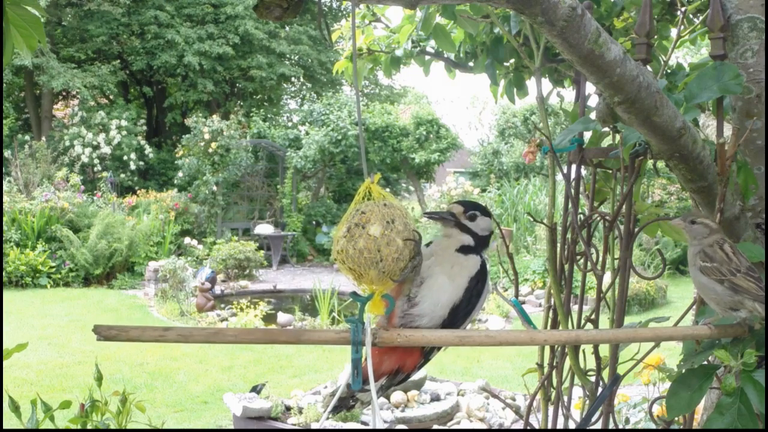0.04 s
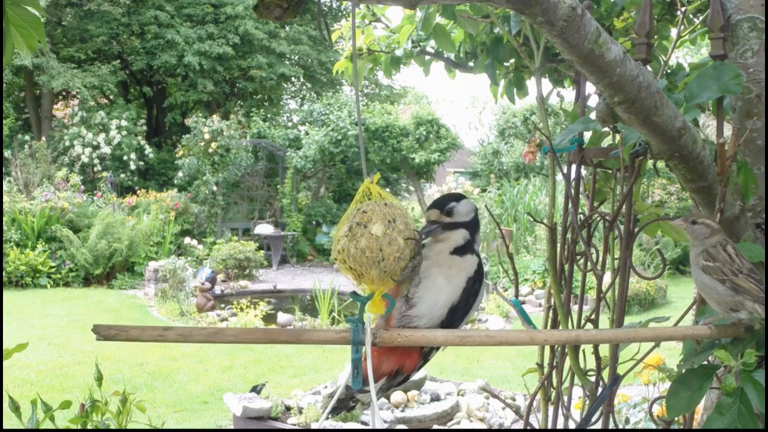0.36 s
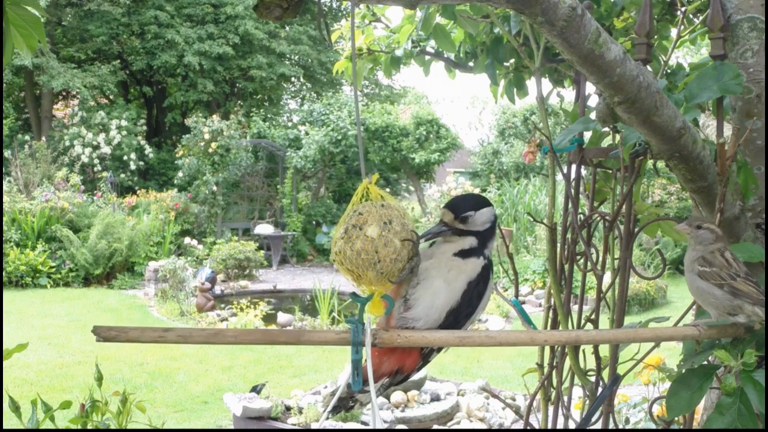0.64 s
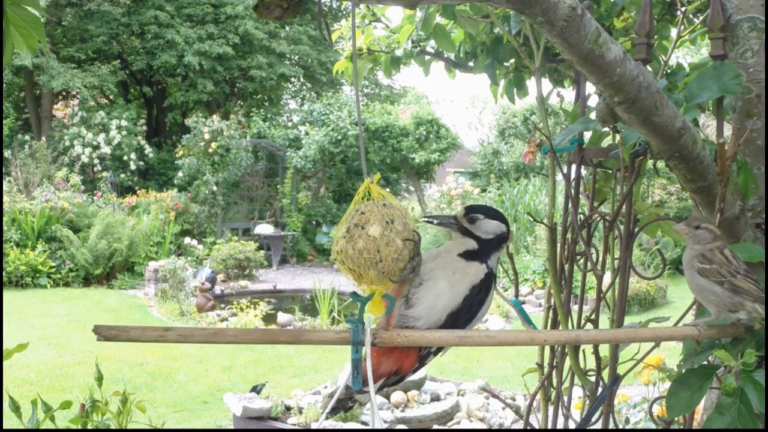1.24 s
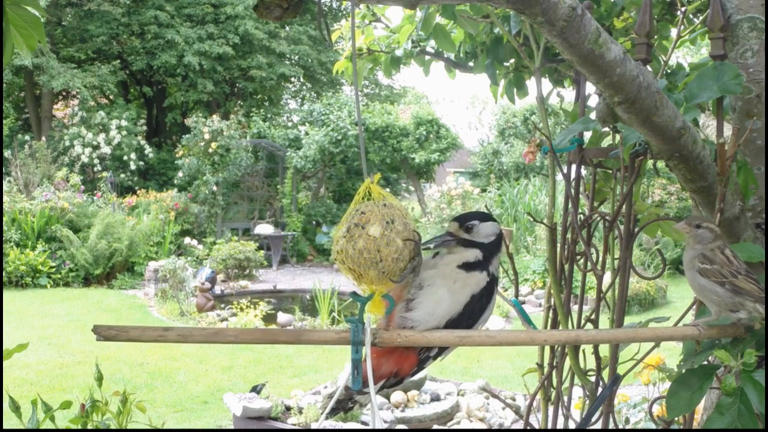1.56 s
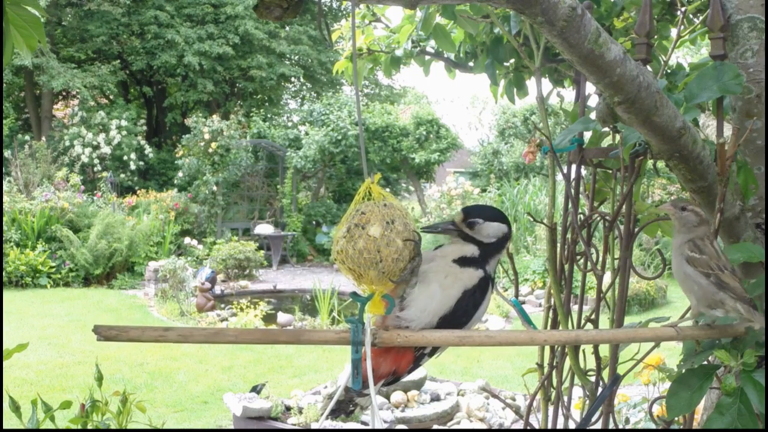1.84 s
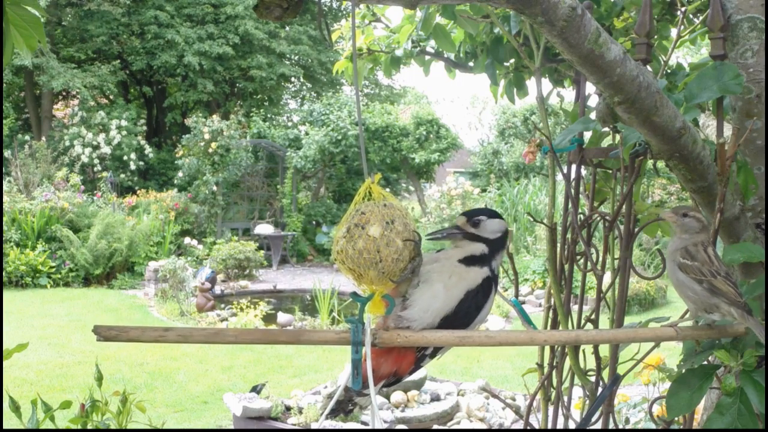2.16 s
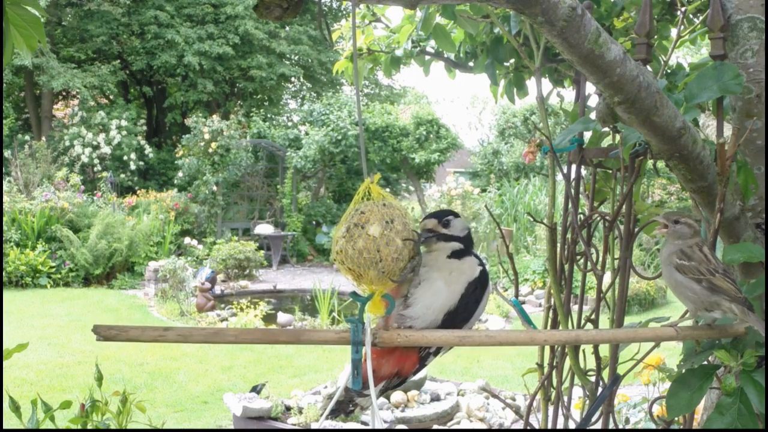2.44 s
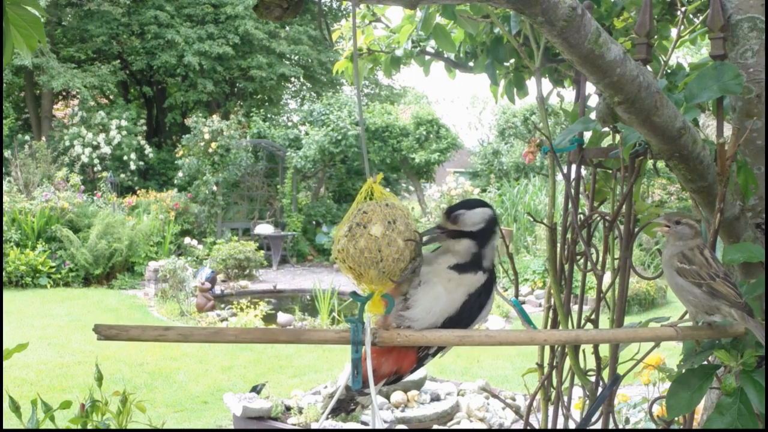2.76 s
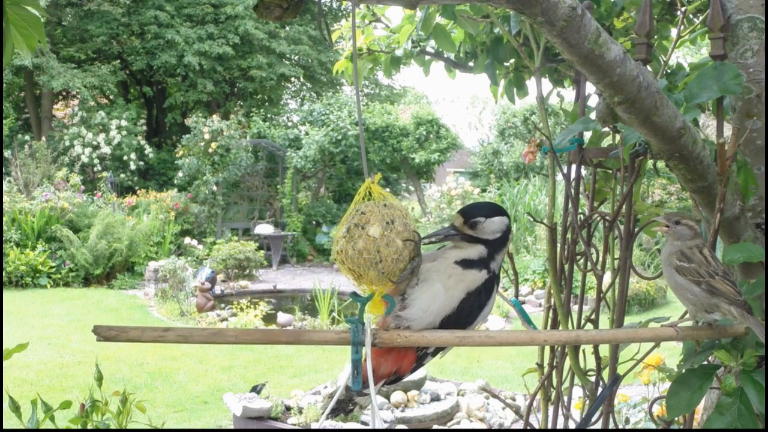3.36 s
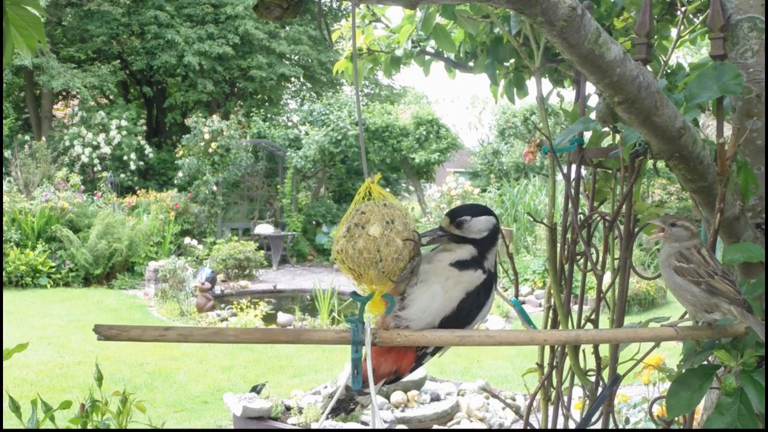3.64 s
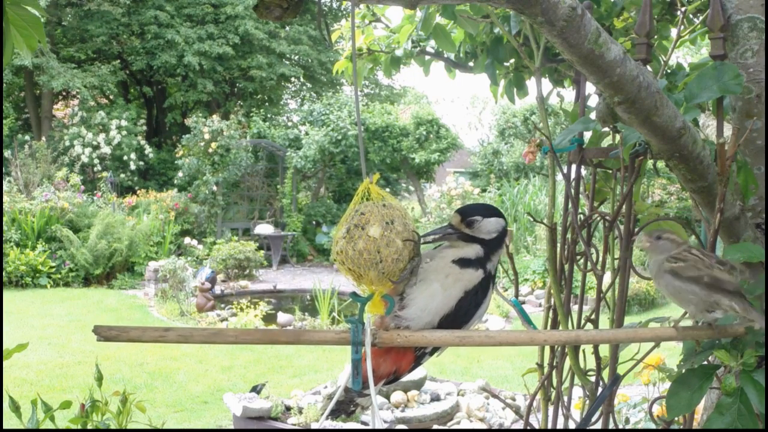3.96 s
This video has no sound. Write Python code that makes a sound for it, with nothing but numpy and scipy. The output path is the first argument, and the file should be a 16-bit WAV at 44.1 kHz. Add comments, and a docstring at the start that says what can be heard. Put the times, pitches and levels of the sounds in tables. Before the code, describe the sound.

In a quiet garden, faint raspy sparrow chirps and soft woodpecker pecks sit over a distant rumble and leaf hiss. Near the end, much louder wings flutter against the microphone, pushing air into it, scraping and knocking its housing.

```python
"""A small bird flutters right by the microphone, probably taking off, after a quiet spell in a garden.
Each wingbeat pushes a thump of air into the microphone, and feathers scuff its housing amid a few knocks.
Before that, a woodpecker picks softly at a fat ball while sparrows chirp in the trees in raspy whistles.
Behind them are other birds, faint hoots, thin ticks, a distant rumble and the hiss of leaves."""
import sys
import numpy as np
from scipy import signal
from scipy.fft import rfft, irfft
from scipy.io import wavfile
from scipy.ndimage import uniform_filter1d

SR = 44100
rng = np.random.default_rng(int(sys.argv[2]) if len(sys.argv) > 2 else 0)


def unload_audio(sound):
    """Save the sound as a 16-bit wav file, at the path given as the first command line argument."""
    columns = np.transpose(np.atleast_2d(sound))
    # keep every value between -1 and 1, then stretch to whole-number steps
    steps = np.round(np.clip(columns, -1, 1) * 32767)
    wavfile.write(sys.argv[1], SR, steps.astype(np.int16))


N = 176400
T = np.arange(N) / SR


def undb(db):
    """Turn decibels into a gain."""
    return 10 ** (np.asarray(db) / 20)


def unit(x):
    """Scale a signal to an average power of 1."""
    return x / np.sqrt(np.mean(x ** 2) + 1e-18)


def wander(rate_hz):
    """A smooth random drift of about 1 either way."""
    step = max(int(SR / rate_hz), 1)
    return unit(uniform_filter1d(np.repeat(rng.standard_normal(N // step + 2), step), step)[:N])


def convolve(x, response):
    """Pass a sound through a filter or echo pattern scaled to an energy of 1."""
    return signal.fftconvolve(x, response / np.linalg.norm(response))[:N]


def colour(x, tone):
    """Shape the bass and treble along a curve of (freq_hz, gain_db) points."""
    hz, db = np.array(tone, float).T
    size = 8192
    freqs = np.maximum(np.arange(size // 2 + 1) * SR / size, 1)
    cepstrum = irfft(np.log(undb(np.interp(np.log(freqs), np.log(hz), db))))
    # folding it in half keeps the filter from ringing before the sound arrives
    cepstrum[1:size // 2] *= 2
    cepstrum[size // 2 + 1:] = 0
    return convolve(x, irfft(np.exp(rfft(cepstrum))))


def grit(per_s, spread_db):
    """Dense random clicks whose sizes vary with spread_db."""
    clicks = (rng.random(N) < per_s / SR) * rng.choice([-1, 1], N)
    return unit(clicks * undb(spread_db * rng.uniform(-2.6, 2.4, N)))


def burst(start_s, hold_s=0, fade_s=0.001):
    """A loudness curve that jumps up, holds and dies away."""
    return (T >= start_s) * np.exp(-np.maximum(T - start_s - hold_s, 0) / fade_s)


def bump(centre_s, width_s):
    """A bell-shaped rise and fall."""
    return np.exp(-((T - centre_s) / width_s) ** 2 / 2)


def add(out, start_s, x):
    """Mix x into out from the given time on."""
    i = int(start_s * SR)
    out[i:i + len(x)] += x[:max(N - i, 0)]


def whistle(hz, rough, shake_hz=400, shakes_per_s=900):
    """A bird's tone whose pitch and strength shake quickly when it is rough."""
    steps = T[:len(hz)] * shakes_per_s
    shake, tremble = (rough * np.interp(steps, np.arange(512), row)
                      for row in rng.standard_normal((2, 512)))
    phase = 2 * np.pi * np.cumsum(hz + shake_hz * shake) / SR
    return unit((1 + 1.2 * tremble) * np.sin(phase))


def garden_echo(x, echo_db, ring_s=0.65):
    """Trees and walls add a wash of reflections that drops 60 dB in ring_s."""
    echoes = rng.standard_normal(N) * undb(-60 * T / ring_s) * (1 - np.exp(-T / 0.0024))
    return x + undb(echo_db) * convolve(x, echoes)


def air(noise_db=-54, hum_hz=100.4, hum_db=-66.5):
    """Distant rumble and leaf hiss, with a faint wavering hum."""
    # tone of the garden air: freq_hz, gain_db
    air_tone = [(20, -10), (50, 4), (75, -3.5), (105, -1.5), (160, -5.5), (300, -7), (500, -12),
                (1000, -16), (2400, -22), (4600, -25), (5600, -27), (7000, -33.5), (10500, -35),
                (15000, -46.5)]
    hum = np.sqrt(2) * np.sin(2 * np.pi * np.cumsum(hum_hz + 3.18 * wander(8.7)) / SR)
    noise = colour(rng.standard_normal(N), air_tone)
    return noise * undb(noise_db + 0.3 * wander(2.18)) + undb(hum_db) * hum


def hoots():
    """Soft, pure, low notes from far off."""
    # each hoot: start_s, length_s, pitch_hz, level_db
    notes = [(0.464, 0.11, 272, -55), (2.059, 0.057, 341, -49)]
    out = np.zeros(N)
    for start, length, hz, db in notes:
        t = np.arange(0, length, 1 / SR)
        add(out, start, undb(db) * np.sin(np.pi * t / length) * unit(np.sin(2 * np.pi * hz * t)))
    return garden_echo(out, echo_db=-14)


def twitter(per_s=7, length_s=0.07, pitch_hz=4505, spread_hz=700, fall_hz=475, level_db=-66.5):
    """Raspy, falling chirps of distant sparrows that overlap at random."""
    progress = np.linspace(0, 1, int(length_s * SR))
    out = np.zeros(N)
    for slot, (late, height) in enumerate(rng.random((int(per_s * N / SR), 2))):
        hz = pitch_hz + spread_hz * (2 * height - 1) - fall_hz * (progress - 0.5)
        chirp = np.sin(np.pi * progress) * whistle(hz, rough=0.9)
        add(out, (slot + late) / per_s, undb(level_db) * chirp)
    return garden_echo(out, echo_db=-4)


def other_birds():
    """Short gliding whistles from around the garden."""
    # each note: start_s, length_s, start_hz, end_hz, level_db, roughness (0 is pure)
    notes = [(0.066, 0.1, 3830, 4030, -63, 0.36), (.434, 0.081, 4710, 4670, -64, 0.33),
             (.495, 0.055, 4100, 3870, -59, 0.8), (0.686, 0.11, 7800, 7750, -74, 0.44),
             (.79, .06, 5120, 5080, -63, 0.14), (1.037, .06, 4840, 4660, -62, 1.1),
             (1.145, 0.067, 3730, 3880, -61.5, 0.6), (1.628, 0.046, 4950, 4600, -61, .7),
             (1.828, 0.049, 5810, 5530, -66.5, 1.1), (1.859, 0.058, 3800, 3700, -59, 0.43),
             (1.884, .055, 4050, 3960, -62.5, 0.9), (2.132, .045, 5880, 5800, -66, .4),
             (2.177, 0.068, 4510, 4350, -60, 1.47), (2.22, 0.063, 4630, 4600, -63, 0.33),
             (2.54, 0.025, 5800, 5200, -62, 1.05), (2.547, 0.062, 5240, 5130, -60, 0.43),
             (2.742, .072, 5200, 4650, -62, 1.3), (2.779, 0.043, 4900, 3920, -56, 0.47),
             (2.822, 0.047, 3850, 3600, -59, .9), (2.887, 0.034, 5440, 3840, -62, 1.1),
             (2.908, 0.084, 3750, 3840, -57.5, 0.4), (3.147, .27, 4780, 4930, -66.5, 1.37),
             (3.258, 0.1, 4680, 4620, -64, 0.97), (3.235, 0.17, 1824, 1830, -66.5, .08),
             (3.683, 0.083, 2155, 2070, -54, 0.06)]
    out = np.zeros(N)
    for start, length, start_hz, end_hz, db, rough in notes:
        progress = np.linspace(0, 1, int(length * SR))
        hz = start_hz + (end_hz - start_hz) * progress
        add(out, start, undb(db) * np.sin(np.pi * progress) * whistle(hz, rough))
    return garden_echo(out, echo_db=-4)


def ticks():
    """Tiny bursts of noise make dry, very high ticks."""
    # each tick: start_s, level_db
    hits = [(1.028, -57), (1.343, -58.5), (1.407, -61.5)]
    # thin tone of a tick: freq_hz, gain_db
    tick_tone = [(7000, -21), (9000, -2), (10200, 2), (11500, -5), (15000, -32)]
    loudness = sum(undb(db) * burst(start, fade_s=0.0034) for start, db in hits)
    return colour(loudness * rng.standard_normal(N), tick_tone)


def sparrow(echo_delay_s=0.13):
    """A sparrow gives the same two-part chirp four times; the trees send it back blurred."""
    # course of one chirp: time_s, pitch_hz, level_db, roughness (0 is pure)
    chirp_shape = [(0, 3800, -12, .3), (.016, 4250, 0, .55), (.028, 4450, -2, .8), (.037, 3750, -5, .35),
                   (.043, 3650, -30, .3), (.05, 3220, -26, .1), (.056, 3200, -3, .2), (.07, 3180, 0, .25),
                   (.081, 3150, -5, .35), (.088, 2880, -8, .35), (.1, 2850, -13, .3)]
    # each call: start_s, level_db
    calls = [(0.13, -54.5), (.762, -53), (1.423, -53), (2.051, -56)]
    # tone of the chirp scattered by leaves: freq_hz, gain_db
    scatter_tone = [(2400, -35), (3100, -5), (3500, 4.5), (4300, 0), (4800, -7.5), (5500, -34), (7000, -46)]
    times, *columns = np.array(chirp_shape).T
    t = np.arange(0, times[-1], 1 / SR)
    hz, shape_db, rough = (np.interp(t, times, column) for column in columns)
    soft_edges = signal.windows.tukey(len(t), 0.1)
    chirps = np.zeros(N)
    for start, db in calls:
        add(chirps, start, whistle(hz, rough) * undb(db + shape_db) * soft_edges)
    trees = rng.standard_normal(N) * bump(echo_delay_s, width_s=0.054)
    tail = undb(-6) * convolve(chirps, trees)
    scatter = sum(undb(db - 14) * bump(start + echo_delay_s, width_s=0.15) for start, db in calls)
    return garden_echo(chirps, echo_db=-9) + tail + scatter * colour(rng.standard_normal(N), scatter_tone)


def woodpecker(snap_db=11.5, crumble_db=-17):
    """The beak hits the fat ball with a snap, then a tiny crunch with a crumbling tail."""
    # each peck: start_s, level_db
    pecks = [(.2079, -54.5), (0.283, -61), (0.365, -59), (0.532, -45.5), (0.5477, -53), (.6709, -55.5),
             (1.4394, -56), (2.071, -57), (2.18, -51.5)]
    # tone of a peck: freq_hz, gain_db
    peck_tone = [(500, -4), (2500, 11), (4000, 7), (6000, 7), (9000, 6), (11500, -2), (13000, -18),
                 (15000, -32)]
    loudness = sum(undb(db) * (burst(start, fade_s=0.0023) + undb(crumble_db) * burst(start, fade_s=0.022))
                   for start, db in pecks)
    crunch = loudness * grit(per_s=30000, spread_db=-10)
    for start, db in pecks:
        add(crunch, start, undb([db + snap_db]))
    return colour(crunch, peck_tone)


def knocks(contact_s=0.00027):
    """Each blow makes the microphone's housing ring briefly, at a slightly different pitch."""
    # each blow: start_s, peak_db, pitch_factor
    blows = [(3.4912, -30.5, 1), (3.5437, -29, 1.27), (3.9076, -24.5, 1.4), (3.9472, -14, 1.06),
             (3.9553, -17, 0.94)]
    # notes of the struck housing: pitch_hz, level_db, ring_s (time to drop 60 dB)
    modes = [(620, -2, 0.0083), (774, -7, .009), (1600, -14, 0.0053), (3100, -11, 0.0049)]
    out = np.zeros(N)
    for start, peak_db, pitch_factor in blows:
        ring = sum(undb(db - 60 * T / ring_s) * np.sin(2 * np.pi * hz * pitch_factor * T)
                   for hz, db, ring_s in modes)
        ring *= 1 - np.exp(-T / contact_s)
        add(out, start, undb(peak_db) * ring / np.abs(ring).max())
    return out


def slips(per_s):
    """A feather catches and lets go, making uneven clicks that all push the same way."""
    gaps, sizes = rng.uniform(0.3, 1.7, (N // 8, 2)).T
    at = (np.cumsum(gaps) * SR / per_s).astype(int)
    return unit(np.bincount(at[at < N], sizes[at < N], N))


def feather_scuffs(slip_db=-10.5, friction_db=-12.5, tail_db=-18.5):
    """Feathers scrape the housing and make it ring, with a dull rub under each stroke."""
    # each stroke: start_s, length_s, scrape_db, rub_db
    strokes = [(3.467, 0.002, -45, -48), (3.4896, 0.001, -30.5, -36), (3.503, .0046, -42, -54),
               (3.5187, 0.0011, -30, -36), (3.5222, 0.0024, -32.5, -27), (3.54, 0.0016, -33.5, -35),
               (3.5434, 0.0033, -21.5, -29), (3.548, 0.0062, -34, -50), (3.555, 0.0033, -24.5, -41),
               (3.634, 0.00092, -40, -64), (3.656, 0.01, -55, -41), (3.665, .0007, -32.5, -50),
               (3.8583, 0.0033, -37.5, -38), (3.897, 0.0045, -34.5, -36), (3.905, 0.0037, -33.5, -28),
               (3.9471, 0.0019, -26.5, -24), (3.9523, .0028, -29.5, -39), (3.991, 0.0059, -36, -26.5)]
    # bright tone of the scrape: freq_hz, gain_db
    scrape_tone = [(300, 5), (1200, -3.5), (2200, 2.5), (3200, 1), (4200, -2), (5400, -1), (9000, -2.5),
                   (10500, -8), (12000, -16.5), (15000, -29)]
    # dull tone of the rub: freq_hz, gain_db
    rub_tone = [(100, 9.5), (300, 0), (600, 4.5), (800, -9.5), (1100, -9.5), (1500, -6.5), (2500, -20.5),
                (6000, -42)]
    # where the housing rings: pitch_hz, width_hz, gain_db
    housing = [(524, 120, -6), (1443, 52, 12), (2010, 87, 3), (3920, 110, 2), (4470, 160, 3.5)]
    scraping, rubbing = np.zeros((2, N))
    for start, length, scrape_db, rub_db in strokes:
        tail = undb(tail_db) * burst(start, length, fade_s=0.029)
        scraping += undb(scrape_db) * (burst(start, length, fade_s=0.0018) + tail)
        rubbing += undb(rub_db) * burst(start, length, fade_s=0.0014)
    texture = undb(slip_db) * slips(per_s=1500) + undb(friction_db) * grit(per_s=25000, spread_db=0)
    scrape = colour(scraping * texture, scrape_tone)
    ring = sum(undb(db) * signal.lfilter(*signal.iirpeak(hz, hz / width, SR), scrape)
               for hz, width, db in housing)
    rub = colour(rubbing * grit(per_s=12000, spread_db=1), rub_tone)
    return scrape + ring + rub


def wings(suction_db=-2.5):
    """Each beat pushes air and sucks it back; feathers rustle and swirling air rumbles in between."""
    # each wingbeat: time_s, push_db, rise_s, fall_s, suction_width_s
    beats = [(3.481, -33.5, 0.0025, 0.0024, 0.0036), (3.543, -25.5, 0.0017, 0.0027, 0.0046),
             (3.621, -30, 0.0041, 0.004, .0058), (3.682, -31, 0.0055, 0.0031, 0.0034),
             (3.791, -32, 0.0012, 0.0015, .003), (3.848, -37, .0027, 0.0021, .003),
             (3.886, -14.5, 0.0016, 0.0025, 0.0025), (3.923, -9, 0.0027, 0.0024, 0.0046),
             (3.943, -24, 0.0044, 0.0046, 0.0014), (3.9597, -8.5, 0.001, .0033, 0.0042),
             (3.9985, -10, 0.001, 0.0021, 0.0026)]
    # strength of the flutter: time_s, rustle_db, swirl_db
    flutter = [(3.36, -67, -86), (3.44, -55.5, -57), (3.48, -48.5, -48), (3.51, -41.5, -41),
               (3.56, -51, -46), (3.61, -46.5, -42.5), (3.67, -48.5, -44.5), (3.72, -49.5, -37.5),
               (3.79, -51, -39.5), (3.84, -47.5, -30), (3.87, -44.5, -27.5), (3.94, -41.5, -27),
               (3.975, -49.5, -27.5), (4, -37.5, -30)]
    # tone of rustling feathers: freq_hz, gain_db
    rustle_tone = [(150, 2.5), (450, 4), (900, -1), (2500, -5.5), (4300, -8), (6000, -12), (10000, -17.5),
                   (12000, -24), (15000, -35)]
    # tone of air swirling against the microphone: freq_hz, gain_db
    swirl_tone = [(15, -17), (35, 0.5), (70, 1.5), (105, -2), (150, -5.5), (250, -16.5), (500, -26),
                  (1500, -79)]
    thumps = np.zeros(N)
    for time, db, rise, fall, suction_width in beats:
        width = np.where(T < time, rise, fall)
        push = bump(time, width)
        ease_in = (1 + np.tanh((T - time) / width - 1)) / 2
        suction = ease_in * bump(time + 2.3 * fall, suction_width)
        thumps += undb(db) * (push - undb(suction_db) * suction)
    times, *levels = np.array(flutter).T
    rustle_db, swirl_db = (np.interp(T, times, level, left=-120) for level in levels)
    rustle = grit(per_s=24000, spread_db=3.5) * undb(rustle_db + 2.94 * wander(150))
    swirl = colour(rng.standard_normal(N), swirl_tone) * undb(swirl_db)
    return thumps + colour(rustle, rustle_tone) + swirl


def scene():
    """The garden and, near the end, the flutter at the microphone, in one channel."""
    garden = air() + sparrow() + other_birds() + twitter() + hoots() + woodpecker() + ticks()
    return (garden + feather_scuffs() + knocks() + wings())[None]


def record(dry):
    """The camera cuts off the highest treble."""
    top_hz = 15200
    return signal.sosfilt(signal.ellip(8, 0.2, 70, top_hz, fs=SR, output="sos"), dry)


dry = scene()
out = record(dry)
unload_audio(out)
```